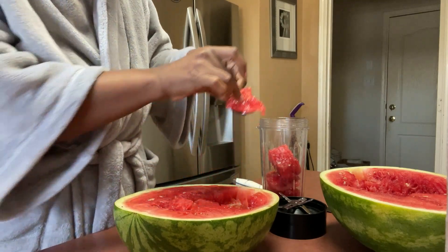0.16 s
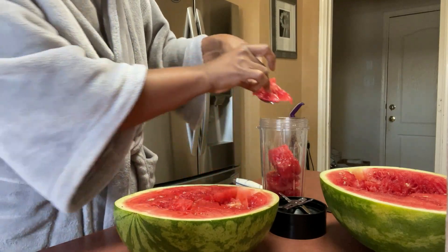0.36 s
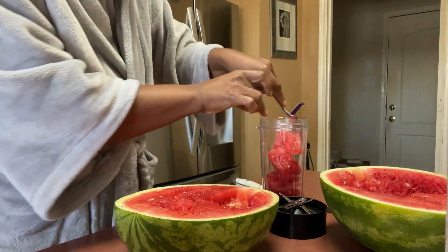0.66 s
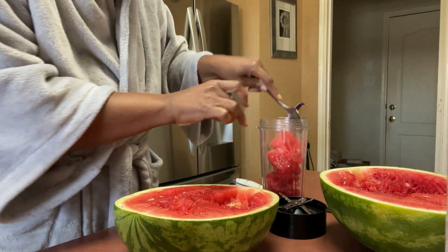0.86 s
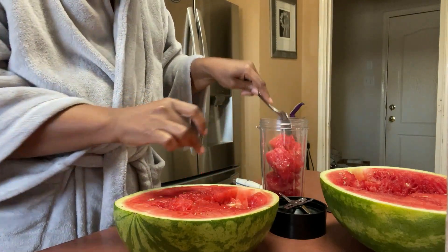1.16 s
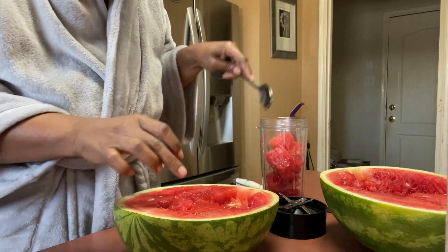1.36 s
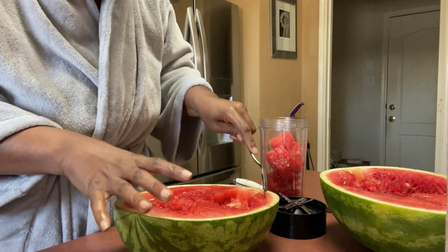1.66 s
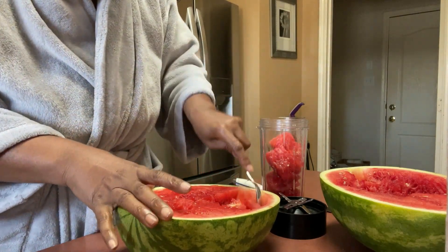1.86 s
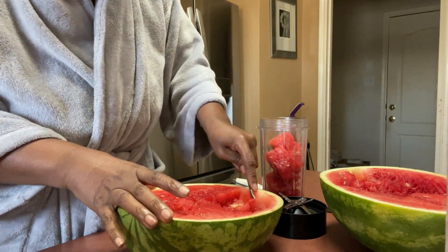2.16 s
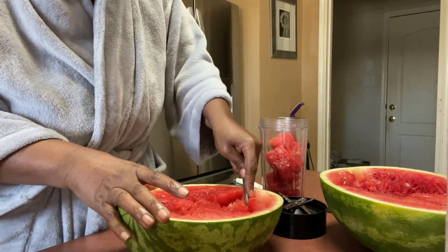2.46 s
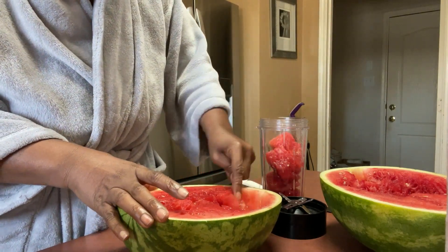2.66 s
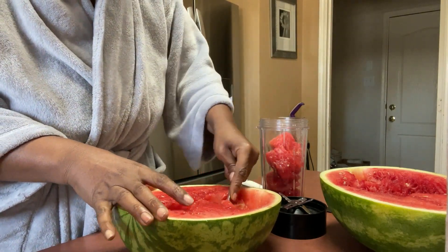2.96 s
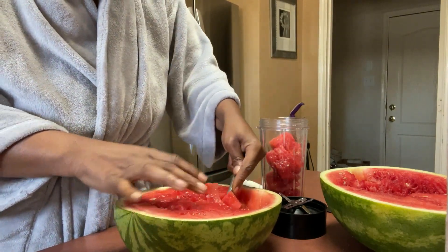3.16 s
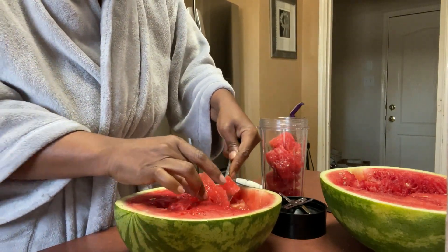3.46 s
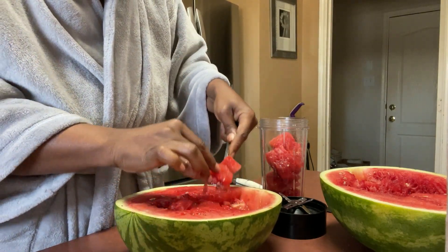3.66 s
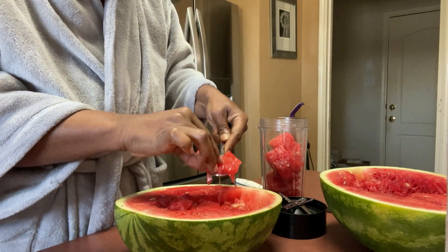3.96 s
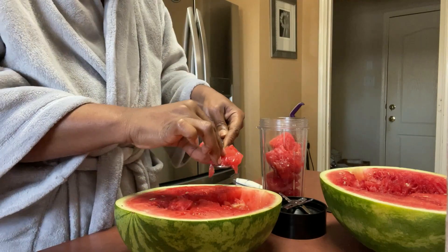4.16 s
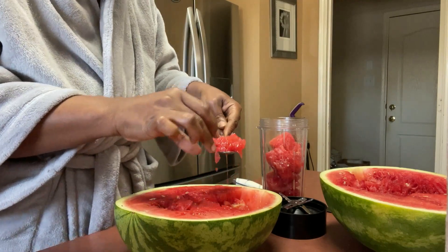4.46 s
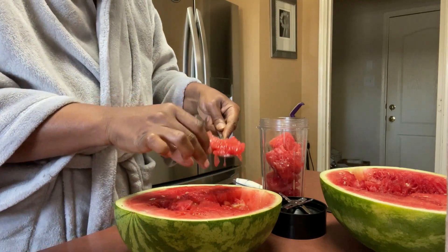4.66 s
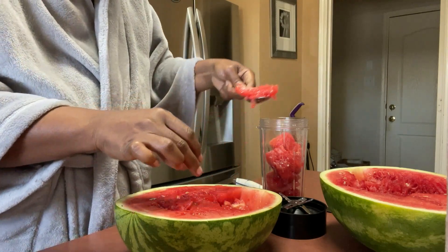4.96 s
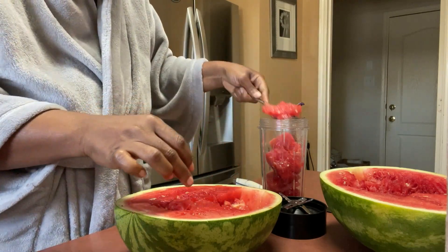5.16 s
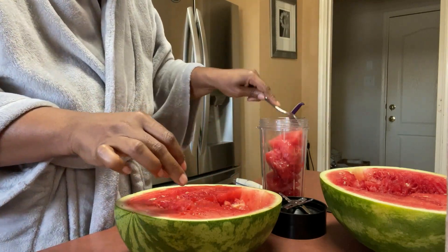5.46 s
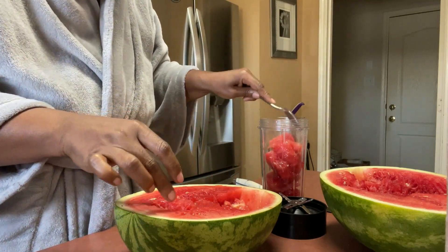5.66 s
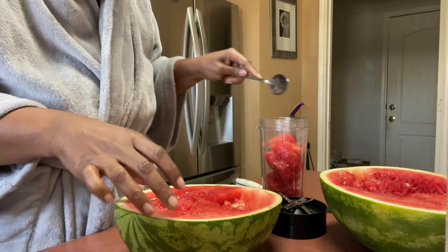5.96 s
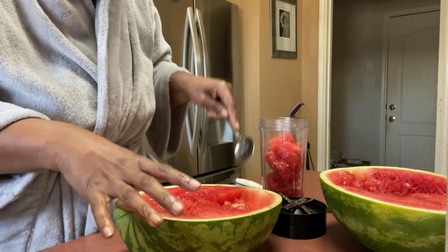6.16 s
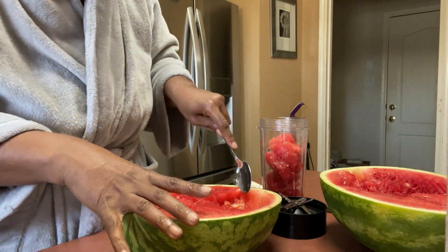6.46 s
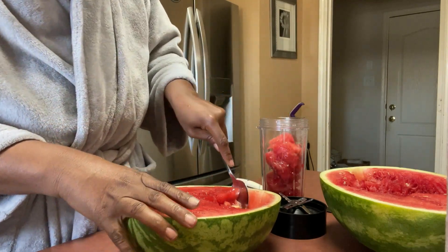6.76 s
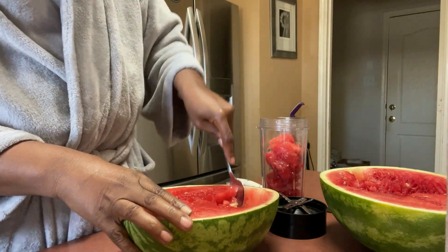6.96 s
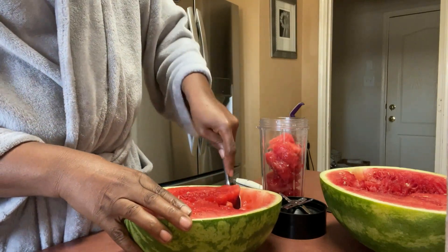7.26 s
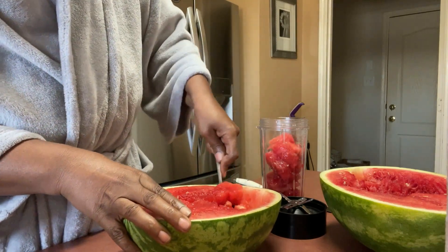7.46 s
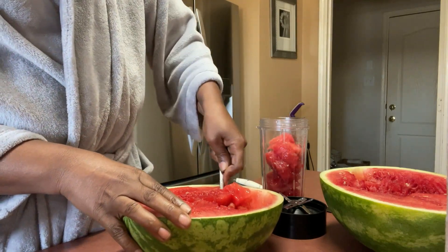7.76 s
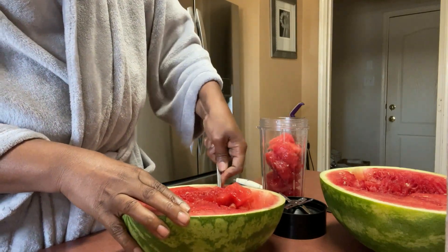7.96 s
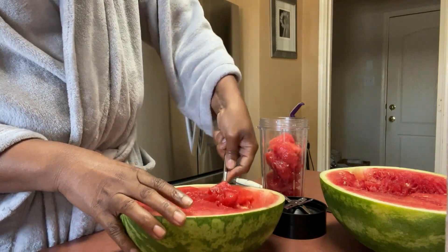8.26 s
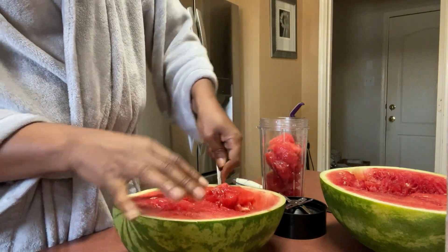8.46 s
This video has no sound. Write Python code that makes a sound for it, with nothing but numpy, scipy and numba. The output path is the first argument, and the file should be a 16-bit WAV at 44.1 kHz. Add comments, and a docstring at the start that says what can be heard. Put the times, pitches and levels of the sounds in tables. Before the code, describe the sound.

Low kitchen hum underneath close, crisp, squelchy watermelon scooping; a piece plops into a plastic blender cup, then another tears loose with a gurgle.

```python
"""A steady appliance motor, likely the fridge, hums in a home kitchen while a sleeve brushes past.
Then a metal spoon scoops watermelon: bursting cells crunch, the slit it opens resonates and fibres snap.
A piece comes loose with a slurp, air gurgling through the resonances of the cavity underneath.
Chunks slap and ring a plastic blender cup on the counter, and squeezed juice fizzes.
The hum is a bank of wavering tones; the wet sounds are random clicks and noise through resonances."""
import sys
import numpy as np
from scipy import signal
from scipy.fft import rfft, irfft
from scipy.io import wavfile
from numba import njit

SR = 44100
rng = np.random.default_rng(int(sys.argv[2]) if len(sys.argv) > 2 else 0)


def wav_out(sig):
    """Save sig, one row per channel (or a flat mono array), as 16-bit PCM at SR to the path in sys.argv[1]."""
    wavfile.write(sys.argv[1], SR, np.round(np.clip(np.atleast_2d(sig).T, -1, 1) * 32767).astype(np.int16))


N = 379260
TIME = np.arange(N) / SR

# All levels are set ahead of the panning and balance in scene().
# motor and mains tones: pitch_hz, level_db (rms, before it wavers)
HUM_TONES = [(56.55, -47), (59.24, -39.7), (119.95, -31.2), (137.02, -36.7), (164.86, -56), (236.09, -65),
             (239.91, -60), (256.97, -57.5), (295.43, -68), (395.84, -69)]
# rumble and air noise of the kitchen, spectrum shape: freq_hz, density_db (per Hz)
AIR_SPECTRUM = [(15, -28), (35, -17), (65, -4.5), (145, -1), (185, -7), (290, -14.5), (420, -23.5),
                (620, -30.5), (900, -33.5), (1200, -42.5), (3000, -51.5), (7500, -59), (11000, -60),
                (15000, -73)]
# left-right likeness of the air noise: freq_hz, likeness (1 = same on both sides, 0 = unrelated)
AIR_LIKENESS = [(40, 0.96), (130, 0.77), (260, 0.62), (500, 0), (1000, 0), (4000, 0.0022), (15000, 0.42)]
# reverberation of the kitchen: freq_hz, t60_s
ROOM_T60 = [(150, 0.12), (500, .42), (2000, 0.41), (6000, 0.3), (14000, 0.17)]
# strength of the reverberation, relative to what is sent into it: freq_hz, level_db
ROOM_LEVEL = [(100, -13), (300, -1.5), (800, 0.5), (2500, -5.5), (7000, 2.5), (14000, -3)]
# rubbing cloth, spectrum shape: freq_hz, density_db (per Hz)
CLOTH_SPECTRUM = [(300, 0), (700, 8), (1200, 0.5), (2200, -1.5), (3500, -2), (5000, -9), (7000, -12),
                  (12000, -19.5), (16000, -23)]
# sleeve and hands brush past: peak_s, level_db, rise_s, fall_s, upper_edge_hz
BRUSHES = [(.36, -62, .3, 0.34, 9000), (1.12, -57.5, .25, 0.24, 2990), (3.05, -64, .35, 1, 9040),
           (3.42, -62, .04, 0.052, 4970), (8.5, -66, .24, .4, 9000)]
# chunks landing in the cup and flopping over: start_s, splat_db, thud_db
DROPS = [(.705, -41.5, -45.5), (5.3799, -25.5, -11), (5.3984, -31.5, -33)]
# ringing modes of cup and fruit: pitch_hz, level_db, t60_s
CUP_MODES = [(218, 0, .1), (265, -2, .09), (343, -1, .08), (445, 5, .075), (510, 5.5, .08), (600, -1, .06),
             (727, 0, .065), (860, -5, .06), (1000, -4, .06), (1650, -17, .08), (2470, -20, .1)]
# wet slap of a chunk, spectrum shape: freq_hz, density_db (per Hz)
SLAP_SPECTRUM = [(200, 10), (900, -3), (1500, -12), (2600, -22), (3500, -21.5), (4900, -23), (5800, -35.5),
                 (7000, -47.5), (15000, -52)]
# juice squeezed out as a chunk settles, spectrum shape: freq_hz, density_db (per Hz)
SQUELCH_SPECTRUM = [(1200, -8), (1900, -0.5), (2500, -4), (4000, -9.5), (4700, -29), (9000, -45.5)]
# juice squeezed out by fingers, the spoon or a settling chunk: peak_s, level_db, rise_s, fall_s, pitch_hz
SQUEEZES = [(.04, -58.5, .4, 0.25, 2220), (.05, -62.5, 0.28, 0.18, 3280), (2.682, -45, 0.024, .02, 3620),
            (2.89, -59, .012, .029, 2130), (2.99, -61, .04, 0.075, 2700), (3.17, -60.5, .05, 0.13, 3340),
            (3.91, -69, .12, .08, 2240), (5.48, -60.5, 0.084, .06, 2510), (8.07, -53, .07, .04, 5800)]
# the largest air pockets opening in the juice: start_s, level_db (peak), start_pitch_hz, swell_s
POCKETS = [(2.525, -51, 1330, .004), (2.728, -40, 1400, .003), (7.491, -35, 565, 0.01),
           (7.510, -37, 1930, .005), (7.524, -26.5, 2000, 0.0033), (7.529, -28, 830, .003),
           (7.541, -27, 1450, 0.0038), (7.552, -33, 2330, 0.0018), (7.551, -32, 588, 0.0069),
           (7.556, -26, 908, .003), (7.572, -26, 1450, .004), (7.576, -23, 2245, .002),
           (7.579, -27, 1680, .002), (7.578, -29, 711, 0.0038), (7.600, -33, 870, .003),
           (7.607, -27.5, 1500, 0.0043), (7.665, -40, 2280, .002), (7.665, -43, 2050, .002)]
# resonances of the cavity under the spoon: pitch_hz (once risen), width_hz, level_db
CAVITY_MODES = [(600, 100, -7), (750, 120, -0.5), (894, 140, -1.5), (1100, 150, -3.5), (1333, 110, 3.5),
                (1510, 140, 4.5), (1780, 160, -8), (2070, 160, -7), (2350, 120, -13)]
# the emptied hollow: pitch_hz, width_hz (first of two resonances), level_db
HOLLOW_MODES = [(1336, 130, -3.5), (1510, 110, 3), (2360, 140, -15)]
# fibres snapping: start_s, level_db (peak), centre_hz, width_hz, length_s
# centre_hz and width_hz are nominal: the band keeps the lower 0.8 of the width
SNAPS = [(0.701, -50, 5330, 700, 0.0036), (1.912, -39, 9000, 8000, 0.0021), (1.911, -41, 2010, 700, .002),
         (2.633, -42, 3020, 4000, .004), (2.721, -26, 1450, 900, .002), (2.740, -35.5, 11000, 4000, 0.0034),
         (2.744, -26.5, 5900, 1400, 0.0013), (2.786, -36.5, 11000, 5000, .002),
         (2.951, -39.5, 2200, 1500, 0.0025), (2.95, -41.5, 5750, 1800, .002),
         (3.126, -46.5, 3500, 8000, 0.0025), (3.405, -40, 1850, 1500, .003),
         (3.410, -55.5, 6300, 1300, 0.0093), (3.892, -50, 5120, 2000, .003),
         (3.938, -48, 7850, 1200, 0.0052), (7.510, -39, 5760, 1100, .002), (7.553, -24, 5600, 1500, 0.0022),
         (7.558, -25, 14500, 2500, .002), (7.571, -34, 6200, 1000, .002), (7.573, -17, 14600, 3000, .003),
         (7.574, -19, 7500, 11000, 0.0024), (7.577, -20, 4000, 800, .003), (7.577, -20, 8500, 12000, .003),
         (7.572, -17, 14600, 3000, 0.0026), (8.084, -29, 2200, 900, 0.0017),
         (8.087, -21.5, 10400, 5000, .002), (8.084, -25, 6030, 1400, 0.0044),
         (8.116, -31, 1900, 1600, 0.0017), (8.476, -50, 1100, 1200, .002)]
# small bubbles in the cut, spectrum shape: freq_hz, density_db
JUICE_SPECTRUM = [(300, -7), (520, 1), (850, 2.5), (1200, -6.5), (1900, -4), (3000, -18)]
# bowl of the spoon: pitch_hz, width_hz (first of two resonances), level_db
SPOON_MODES = [(1710, 200, -9), (4000, 220, -19), (6940, 150, 1), (10750, 600, -3.5), (13950, 200, 0.5),
               (15300, 400, -3)]
# the spoon skims the surface: peak_s, level_db (ring), rise_s, fall_s, rustle_db (relative to the ring)
SKIMS = [(1.765, -61.5, 0.037, 0.038, 5.5), (1.88, -53.5, 0.038, 0.037, 2), (6.485, -68, 0.13, 0.11, -9.5),
         (6.70, -54, 0.088, 0.18, -4.5)]
# tearing flesh, spectrum shape: freq_hz, density_db (per Hz)
CRUNCH_SPECTRUM = [(250, 8.5), (500, 1), (800, -3.5), (1050, -11.5), (1550, 1), (2300, 1), (2850, -4.5),
                   (3500, 2.5), (4700, -1.5), (6100, 0), (8400, -12), (10400, -2), (12600, -14.5),
                   (14600, -7)]
# pushes of the spoon through the flesh: peak_s, level_db, rise_s, fall_s, slit_pitch_hz (at the peak),
# then relative to the push, before the layer trims in spoon(): body_db, sparkle_db, slit_db, juice_db
PUSHES = [(1.955, -47, .07, 0.19, 2380, -4, 2.5, -2, -7), (2.155, -41.5, 0.11, 0.076, 2380, -1, -2, 1, -17),
          (2.195, -48.5, .03, .05, 1700, 0, 1, 2, 2.5), (2.385, -42.5, 0.14, 0.1, 1890, -1, -3, 2.5, -10),
          (2.43, -53, .04, 0.052, 1550, 8, -2, 7, 9), (2.652, -46.5, 0.033, 0.032, 2240, 0.5, -6, 4, -2),
          (2.682, -48.5, 0.035, 0.016, 2500, 6.5, -1, 4, -1),
          (6.640, -49, .005, 0.039, 2000, -6, 4.5, -13, -0.5),
          (6.795, -50.5, .14, 0.12, 3200, -2, 2.5, -13, -5),
          (6.975, -42, 0.047, 0.019, 3420, -3.5, -1, -7, -2.5),
          (7.05, -57.5, .18, 0.67, 2350, -6, 0, -4, -9), (7.218, -43, 0.083, 0.15, 3200, -4, 1.5, -4, -10),
          (7.395, -49.5, 0.33, 0.23, 3400, 3.5, -0.5, -1.5, 2),
          (7.513, -43, .01, .036, 3300, 3, -1, -1.5, 7), (7.578, -27, .0066, 0.004, 3780, -3, -2.5, 3, -10),
          (7.69, -50.5, .13, 0.24, 3700, 3.5, -4, 1, -0.5),
          (8.09, -47, 0.18, 0.19, 1750, -2.5, -4.5, -1, -10),
          (8.122, -40.5, .0077, 0.011, 1900, 0, -7, 5, -11),
          (8.138, -36.5, .022, 0.015, 1850, -5.5, -4, 4, -14)]

AIR_DB = -38.5
CUTOFF_HZ = 15700
# every movement builds to a peak and eases off; rise and fall are the times it takes to cover this range
MOVE_RANGE_DB, MOVE_ROUNDNESS = 21.5, 1.04
SEEP_WIDTH_HZ = 520
# a pocket's pitch creeps up by this share as it swells
POCKET_GLIDE = 0.041
SLURP_DB, SLURP_AT_S, SLURP_RISE_S, SLURP_FALL_S = -29, 7.545, 0.052, 0.13
# the cavity's pitch climbs by a share as the piece lifts
SLURP_GLIDE, SLURP_GLIDE_S = 0.063, 0.04
# sloshing juice makes each cavity resonance waver by this share
SLOSH = 0.035
HOLLOW_DB, HOLLOW_DELAY_S, HOLLOW_RISE_S, HOLLOW_FALL_S = -40, 0.1, 0.1, 0.22
# small bubbles in the cut: how many in all, and how sharply each rings
JUICE_POPS_PER_S, JUICE_Q = 380, 12
# the cut gains body as the spoon sinks during a push
DEEPEN_DB_PER_S = 13
# the slit's pitch sinks as it opens and wobbles with the juice in it
SLIT_WIDTH_HZ, SLIT_SINK_OCT_PER_S, SLIT_WOBBLE_OCT = 1320, 0.97, 0.18


def from_db(db):
    """Decibels to gain."""
    return np.exp(np.log(10) / 20 * np.asarray(db))


def rms_one(x):
    """Scale to unit power."""
    return x / np.sqrt(np.mean(x ** 2) + 1e-20)


def at_hz(points, hz):
    """Read a spectrum table on a log-frequency axis."""
    freqs, values = np.transpose(points)
    return np.interp(np.log(np.maximum(hz, 1)), np.log(freqs), values)


def colour(x, spectrum):
    """Weight a signal by a spectrum; rms 1."""
    hz = np.fft.rfftfreq(x.shape[-1], 1 / SR)
    shaped = rfft(x) * from_db(at_hz(spectrum, hz))
    return rms_one(irfft(shaped, x.shape[-1]))


def drift(rate_hz):
    """Random wander along straight lines between points of spread 1."""
    knots = np.arange(0, N / SR + 1, 1 / rate_hz)
    return np.interp(TIME, knots, rng.standard_normal(len(knots)))


def band_pass(x, order, low_hz, high_hz):
    """Keep the band between two edges."""
    return signal.sosfilt(signal.butter(order, [low_hz, high_hz], "band", fs=SR, output="sos"), x)


def resonate(x, hz, width_hz):
    """Two-pole resonance with gain 1 on top."""
    hz = min(hz, 0.45 * SR)
    return signal.lfilter(*signal.iirpeak(hz, hz / min(width_hz, SR / 3), fs=SR), x + 1e-18)


@njit
def two_pole(x, angle, radius):
    """Resonator whose pitch may change on every sample."""
    out = np.zeros(len(x))
    for i in range(2, len(x)):
        drive = (1 - radius ** 2) / 2 * (x[i] - x[i - 2])
        out[i] = drive + 2 * radius * np.cos(angle[i]) * out[i - 1] - radius ** 2 * out[i - 2]
    return out


def glide(x, hz, width_hz):
    """A resonance with gain 1 on top that follows a pitch curve."""
    return two_pole(x, 2 * np.pi * hz / SR, np.exp(-np.pi * width_hz / SR))


def grains(per_s, spread_db):
    """Random clicks of uneven size."""
    born = rng.random(N) < per_s / SR
    size_db = spread_db * np.minimum(rng.exponential(1, N), 4)
    return born * rng.choice([-1, 1], N) * from_db(size_db)


def add(track, s, sound):
    """Mix a short sound into a track at time s."""
    start = max(round(s * SR), 0)
    track[start:start + len(sound)] += sound[:N - start]


def swell(hz, rise_s, glide=0., steepness=1):
    """A tone whose envelope reaches 1 in rise_s and dies away, its pitch sliding by the share glide."""
    t = TIME[:SR // 4]
    age = t / rise_s
    pitch = hz * (1 + glide * np.tanh(age / 2))
    envelope = (age * np.exp(1 - age)) ** steepness
    return envelope * np.sin(2 * np.pi * np.cumsum(pitch) / SR)


def movement(s, db, rise_s, fall_s):
    """Gain over time of one movement that builds to its peak and eases off."""
    away = np.maximum((s - TIME) / rise_s, (TIME - s) / fall_s)
    return from_db(db - MOVE_RANGE_DB * np.clip(away, 0, 10) ** MOVE_ROUNDNESS)


def air():
    """Rumble shared by both sides, thinning to a more diffuse hiss."""
    hz = np.fft.rfftfreq(N, 1 / SR)
    alike = np.clip(at_hz(AIR_LIKENESS, hz), -1, 1)
    mid, side = rfft(rng.standard_normal((2, N)))
    pair = np.sqrt(1 + alike) * mid + np.sqrt(1 - alike) * side * [[1], [-1]]
    return from_db(AIR_DB) * colour(irfft(pair, N), AIR_SPECTRUM)


def motor():
    """Rotor and mains tones beat against each other and waver slightly."""
    out = np.zeros(N)
    for hz, db in HUM_TONES:
        phase = 2 * np.pi * (hz * TIME + rng.random()) + 0.071 * drift(3.3)
        out += np.sqrt(2) * from_db(db + 1.4 * drift(6.1)) * np.sin(phase)
    return out


def kitchen(x):
    """A diffuse tail, different on each side, built from bands that each die at their own rate."""
    t = TIME[:SR // 2]
    edges = np.geomspace(60, 17000, 11)
    onset = 1 - np.exp(-(t / 0.00042) ** 2)
    tail = np.zeros((2, len(t)))
    for low, high in zip(edges, edges[1:]):
        hz = np.sqrt(low * high)
        band = band_pass(rng.standard_normal(tail.shape), 2, low, high)
        band = band * from_db(-60 * t / at_hz(ROOM_T60, hz)) * onset
        bandwidth_gain = np.sqrt(2 * (high - low) / SR / len(t))
        tail += from_db(at_hz(ROOM_LEVEL, hz)) * rms_one(band) * bandwidth_gain
    return signal.fftconvolve(x[None], tail, axes=1)[:, :N]


def sleeve():
    """Soft cloth rubs unevenly; each brush is dulled above its own upper edge."""
    rub = colour(grains(per_s=6500, spread_db=2.0), CLOTH_SPECTRUM) * from_db(2.4 * drift(30))
    out = np.zeros(N)
    for s, db, rise_s, fall_s, edge_hz in BRUSHES:
        low_pass = signal.butter(2, min(edge_hz, SR / 3), fs=SR, output="sos")
        out += movement(s, db, rise_s, fall_s) * signal.sosfilt(low_pass, rub)
    return out


def melon():
    """The heavy melon half rocks against the counter as the spoon goes in: one low thud."""
    out = np.zeros(N)
    add(out, 1.92, from_db(-19.0) * swell(hz=71.0, rise_s=0.024, steepness=2.7))
    return out


def chunks():
    """A soft chunk slaps the cup, rings it and squelches into place; its weight thuds into the counter."""
    out, t = np.zeros(N), TIME[:SR // 2]
    for s, splat_db, thud_db in DROPS:
        slap = colour(rng.standard_normal(len(t)), SLAP_SPECTRUM) * from_db(-60 * t / 0.08)
        squelch = colour(rng.standard_normal(len(t)), SQUELCH_SPECTRUM)
        squelch = squelch * from_db(-60 * t / 0.27 + 2.5 * drift(120)[:len(t)])
        cup = sum(from_db(db - 60 * t / t60) * np.sin(2 * np.pi * hz * t) for hz, db, t60 in CUP_MODES)
        cup = cup * (1 - np.exp(-t / 0.0056))
        contact = 1 - np.exp(-(t / 0.00081) ** 2)   # soft flesh meets the wall gradually
        splat = from_db(-0.5) * slap + from_db(-0.5) * cup + from_db(-23.5) * squelch
        add(out, s, from_db(splat_db) * contact * splat)
        # the thud's pitch sinks
        add(out, s, from_db(thud_db) * swell(hz=149.6, rise_s=0.0205, glide=-0.57, steepness=5.5))
    return out


def seeping():
    """Juice fizzes out of a squeezed piece, at the pitch of the gap it escapes through."""
    fizz = grains(per_s=2500, spread_db=3.0)
    out = np.zeros(N)
    for s, db, rise_s, fall_s, hz in SQUEEZES:
        gap = resonate(resonate(fizz, hz, SEEP_WIDTH_HZ), hz, 2 * SEEP_WIDTH_HZ)
        out += movement(s, db, rise_s, fall_s) * rms_one(gap)
    return out


def pockets():
    """The larger air pockets ring on their own as they open."""
    out = np.zeros(N)
    for s, db, hz, rise_s in POCKETS:
        add(out, s, from_db(db) * swell(hz, rise_s, glide=POCKET_GLIDE))
    return out


def slurp():
    """Air gurgles in bursts into the cavity under the piece, rising in pitch; the hollow sings on."""
    pops = grains(per_s=800, spread_db=2) * from_db(3 * drift(120))
    lift = 1 + SLURP_GLIDE * np.tanh(np.minimum(TIME - SLURP_AT_S, 0) / SLURP_GLIDE_S)
    gurgle = np.zeros(N)
    for k, (hz, width, db) in enumerate(CAVITY_MODES):
        pitch = hz * lift * (1 + SLOSH * drift(60))
        gurgle += (-1) ** k * from_db(db) * glide(pops, pitch, width)   # neighbours in opposite polarity
    froth = from_db(-13.5) * grains(per_s=4000, spread_db=-3.5)
    gurgle = band_pass(gurgle + froth, 3, 480, 2400)
    hollow = sum(from_db(db) * resonate(resonate(pops, hz, width), hz, 2 * width)
                 for hz, width, db in HOLLOW_MODES)
    gurgle_gain = movement(SLURP_AT_S, SLURP_DB, SLURP_RISE_S, SLURP_FALL_S)
    hollow_gain = movement(SLURP_AT_S + HOLLOW_DELAY_S, HOLLOW_DB, HOLLOW_RISE_S, HOLLOW_FALL_S)
    return gurgle_gain * rms_one(gurgle) + hollow_gain * rms_one(hollow)


def snaps():
    """Each snap is a short crackle that rings the pocket of flesh around it."""
    out, t = np.zeros(N), TIME[:SR // 8]
    for s, db, hz, width_hz, length_s in SNAPS:
        low = np.hypot(hz, width_hz / 2) - width_hz / 2
        high = low + 0.8 * width_hz
        crackle = rng.standard_normal(len(t)) * (t / length_s) ** 2 * np.exp(-4.5 * t / length_s)
        burst = band_pass(crackle + 1e-18, 2, min(low, 0.4 * SR), min(high, 0.45 * SR))
        add(out, s, from_db(db) * burst / np.abs(burst).max())
    return out


def juice():
    """Small bubbles pop at random in the cut, each ringing for a few cycles at one of 14 pitches."""
    pitches = np.geomspace(480, 1900, 14)
    pops = np.zeros(N)
    for hz in pitches:
        clicks = grains(per_s=JUICE_POPS_PER_S / len(pitches), spread_db=2.5)
        pops += resonate(clicks, hz, hz / JUICE_Q)
    return colour(pops, JUICE_SPECTRUM)


def sliding(rustle):
    """Fine rubbing on the wet surface rustles and makes the spoon's bowl sing faintly before it digs in."""
    rub = grains(per_s=2700, spread_db=3.0)
    ring = rms_one(sum(from_db(db) * resonate(resonate(rub, hz, width), hz, 3 * width)
                       for hz, width, db in SPOON_MODES))
    return sum(movement(s, db, rise_s, fall_s) * (ring + from_db(rustle_db) * rustle)
               for s, db, rise_s, fall_s, rustle_db in SKIMS)


def wet_crunch(patchy_db, tick_db, grit_db):
    """Cells burst by the thousand in patches of shifting pitch, with larger ticks and fibre grit.

    Returns (low, high, top)."""
    surge = from_db(3.3 * drift(90) + 1.3 * drift(35))
    grit = from_db(grit_db) * rms_one(grains(per_s=88, spread_db=3.5))   # torn fibres, shared by all bands
    ranges = np.zeros((3, N))
    for hz in np.geomspace(300, 15000, 22):
        cells = rms_one(grains(per_s=1800, spread_db=3.0)) * surge * from_db(patchy_db * drift(45))
        ticks = from_db(tick_db) * rms_one(grains(per_s=70, spread_db=4.0))
        which = np.searchsorted([2700, 7500], hz)   # range borders in Hz
        ranges[which] += resonate(resonate(cells + ticks + grit, hz, 0.26 * hz), hz, 0.3 * hz)
    return [colour(part, CRUNCH_SPECTRUM) for part in ranges]


def spoon(low, high, top):
    """The spoon's edge crunches in pushes that gain body with depth, ring the slit and stir up juice."""
    crunch_power, body_power, top_power, slit_power, juice_power, octaves = np.zeros((6, N))
    for s, db, rise_s, fall_s, slit_hz, body_db, sparkle_db, slit_db, juice_db in PUSHES:
        power = movement(s, db, rise_s, fall_s) ** 2
        age = np.clip(TIME - s, -rise_s, fall_s)
        crunch_power += power
        body_power += power * from_db(body_db + DEEPEN_DB_PER_S * age) ** 2
        top_power += power * from_db(sparkle_db) ** 2
        slit_power += power * from_db(slit_db) ** 2
        juice_power += power * from_db(juice_db) ** 2
        octaves += power * (np.log2(slit_hz) - SLIT_SINK_OCT_PER_S * age)
    # overlapping pushes share one slit pitch, weighted by their power
    pitch = 2 ** (octaves / crunch_power + SLIT_WOBBLE_OCT * drift(70))
    cells = grains(per_s=1500, spread_db=3) * from_db(3.9 * drift(110))
    slit = rms_one(glide(glide(cells, pitch, SLIT_WIDTH_HZ), pitch, SLIT_WIDTH_HZ))
    return (from_db(2.0) * np.sqrt(body_power) * low
            + from_db(0.26) * np.sqrt(crunch_power) * high
            + from_db(-4.0) * np.sqrt(top_power) * top
            + from_db(-1.1) * np.sqrt(slit_power) * slit
            + np.sqrt(juice_power) * juice())


def scene():
    """Work at the counter over the steady hum, which leans to the left."""
    steady = motor() + air()
    low, high, top = wet_crunch(patchy_db=4, tick_db=-6, grit_db=-1.5)
    skim = sliding(rms_one(low + high))
    work = skim + spoon(low, high, top) + melon() + seeping() + sleeve()
    cracks, landings, gurgle, plops = snaps(), chunks(), slurp(), pockets()

    # the spoon is a little to the right, so its sound arrives there first
    lag_s, spoon_pan_db, hum_pan_db = 0.000115, 0.2, 0.85
    near = work + landings + plops + from_db(-2.5) * gurgle + from_db(3.5) * cracks
    left = np.roll(near, round(lag_s * SR))
    direct = np.array([left, near]) * from_db([[-spoon_pan_db], [spoon_pan_db]])

    # snaps at the open surface and landings in the cup sound drier than the gurgle deep inside the rind
    send = (work + from_db(-1) * landings + from_db(-2) * cracks
            + from_db(0.5) * plops + from_db(4) * gurgle)
    return direct + kitchen(send) + steady * from_db([[hum_pan_db], [-hum_pan_db]])


def record(dry):
    """The top is cut steeply."""
    return signal.sosfilt(signal.ellip(10, 0.1, 80, CUTOFF_HZ, fs=SR, output="sos"), dry)


dry = scene()
out = record(dry)
wav_out(out)
```